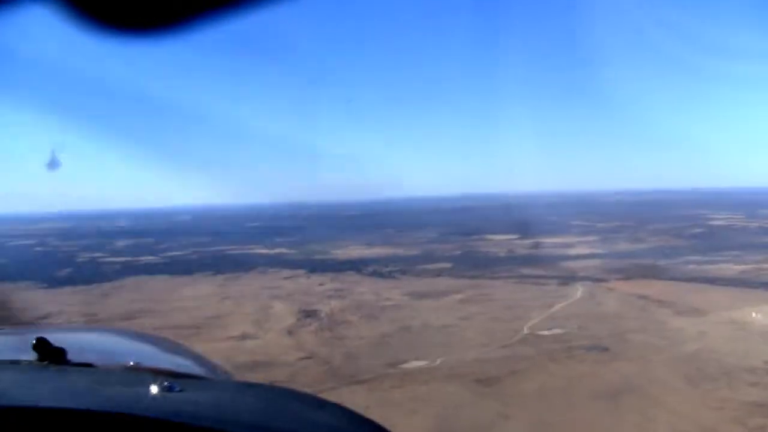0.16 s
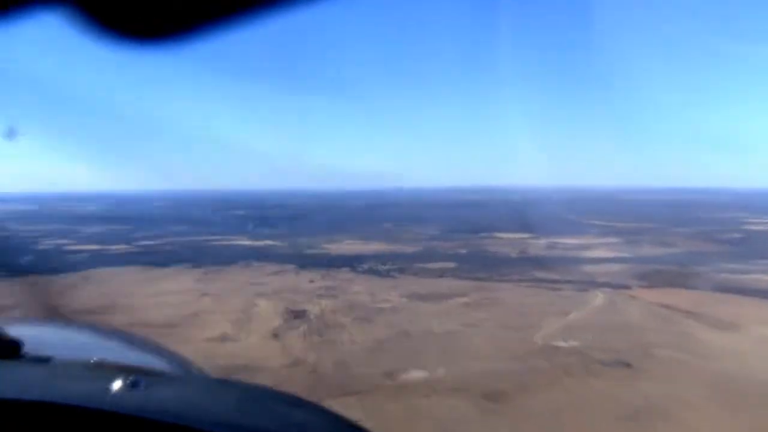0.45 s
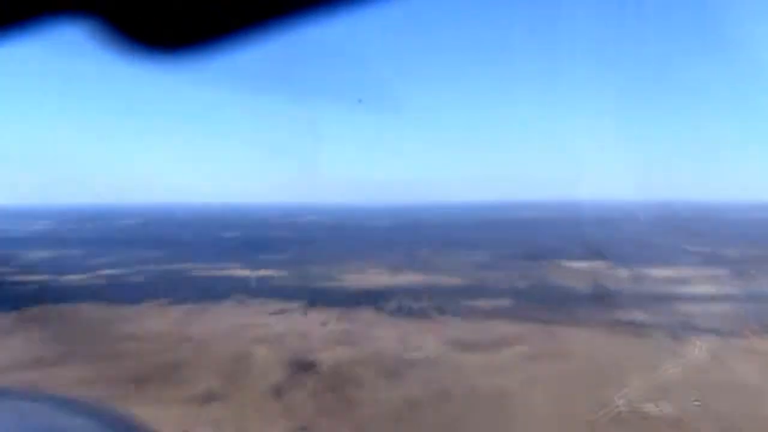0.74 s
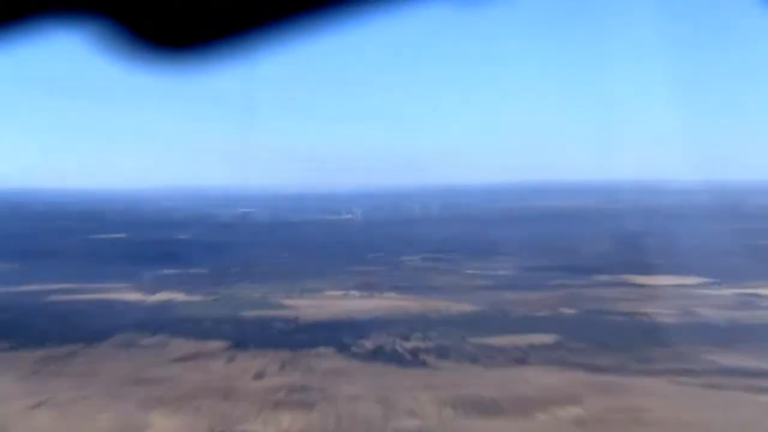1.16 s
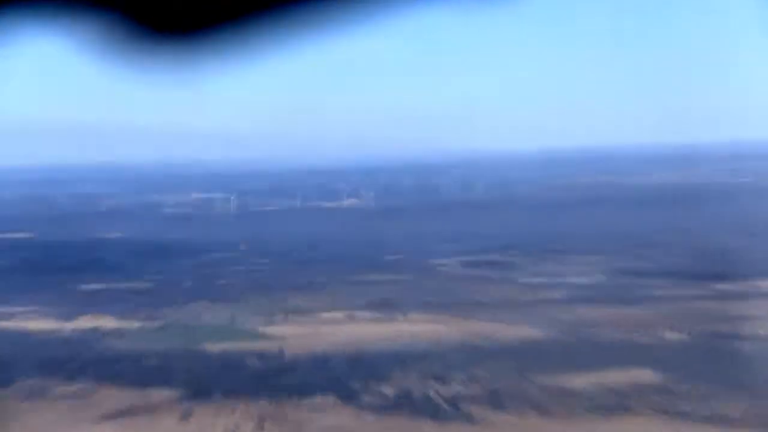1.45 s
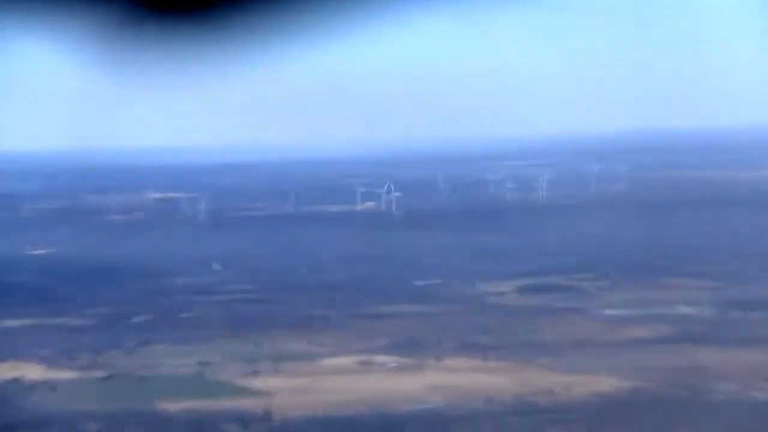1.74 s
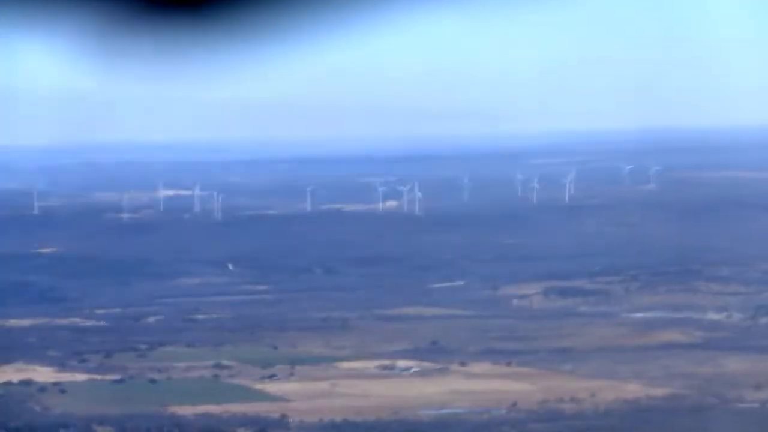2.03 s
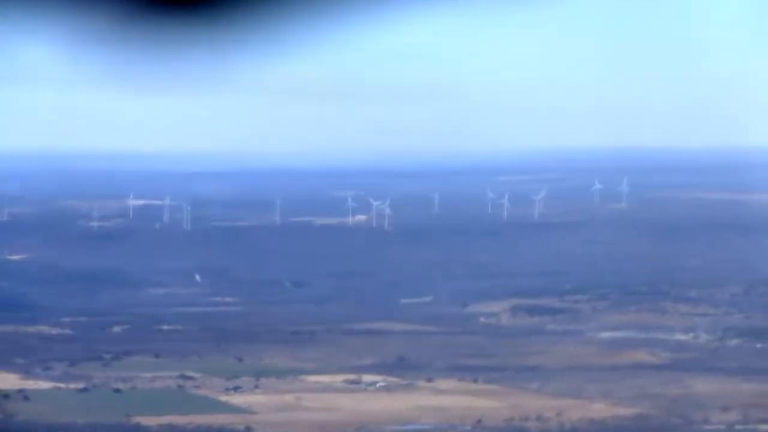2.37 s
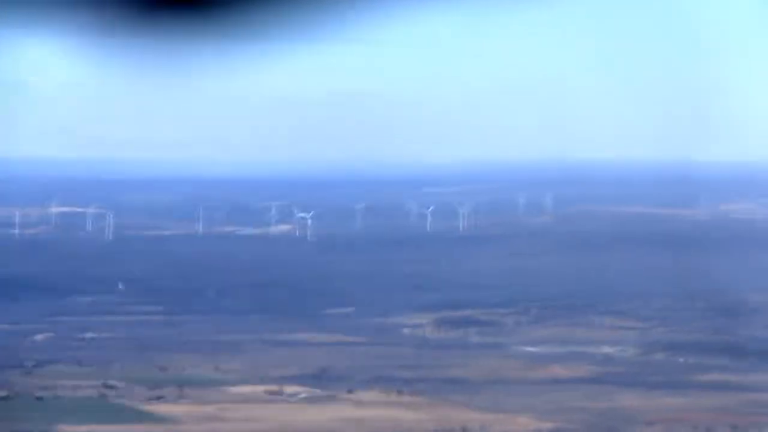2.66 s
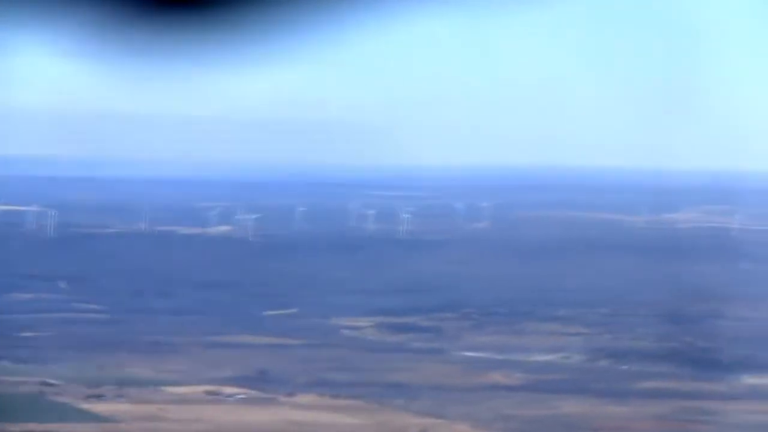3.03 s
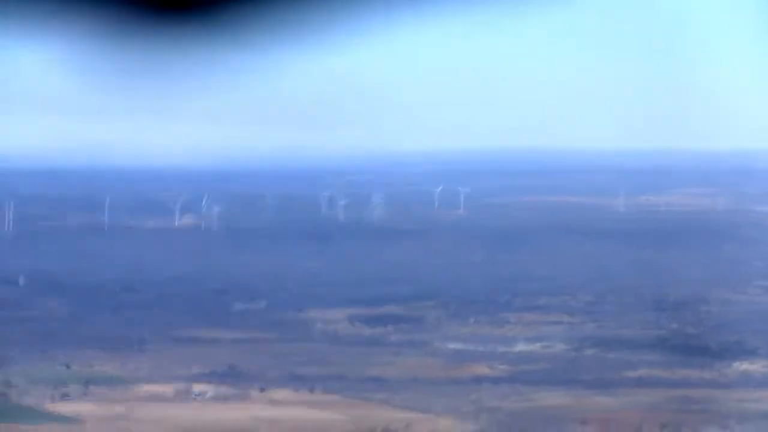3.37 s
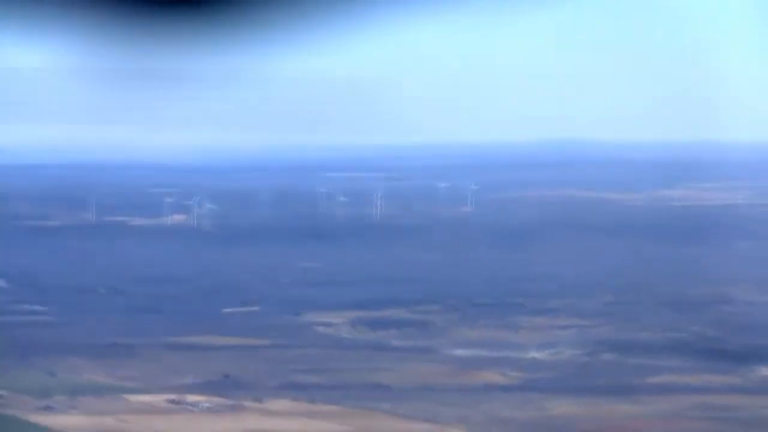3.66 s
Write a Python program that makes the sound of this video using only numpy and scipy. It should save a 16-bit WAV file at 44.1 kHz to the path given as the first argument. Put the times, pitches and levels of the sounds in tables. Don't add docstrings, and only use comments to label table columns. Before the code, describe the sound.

A small piston aircraft engine and propeller drone steadily in the cabin, louder on the right, over low wind buffeting. Thin hiss, a faint high whine and a few sharp electrical ticks sit on top.

```python
import sys
import numpy as np
from scipy import signal
from scipy.fft import rfft, irfft, next_fast_len
from scipy.io import wavfile
from scipy.ndimage import uniform_filter1d

SR = 44100
rng = np.random.default_rng(int(sys.argv[2]) if len(sys.argv) > 2 else 0)


def waveform_to_disk(signal):
    frames = np.transpose(np.atleast_2d(signal))
    scaled = np.clip(frames, -1, 1) * 32767
    samples = np.round(scaled).astype(np.int16)
    wavfile.write(sys.argv[1], SR, samples)


def gain_from_db(level_db):
    decades = np.asarray(level_db, float) / 20
    return 10 ** decades


N = 167580

# time [s], whine frequency [Hz].
WHINE_PITCH = [(0, 5048.5), (.8, 5048), (1.2, 5041), (1.8, 5033), (1.9, 5027.5), (2.15, 5028.5),
               (2.3, 5021.5), (2.7, 5021.5), (3.1, 5035), (3.4, 5047), (3.65, 5048), (3.8, 5044)]


def walk(rate_hz):
    hold = int(SR / rate_hz)
    held = np.repeat(rng.standard_normal(N // hold + 1), hold)
    return 1.39 * uniform_filter1d(uniform_filter1d(held, hold), hold)[:N]


def curve(table, axis):
    rows = np.array(table)
    return np.interp(np.arange(N) / SR, rows[:, 0], rows[:, axis])


def noise(shape, level_db, flicker_db, rate_hz, count):
    rows = np.array(shape)
    size = next_fast_len(N)
    log_hz = np.log(np.maximum(np.arange(size // 2 + 1) * SR / size, 1))
    shape_db = np.interp(log_hz, np.log(rows[:, 0]), rows[:, 1], -99, -99)
    spectrum = rfft(rng.standard_normal(size)) * gain_from_db(shape_db)
    centres = np.linspace(np.log(rows[0, 0]), np.log(rows[-1, 0]), count)
    out = 0
    for pick in np.eye(count):
        band = irfft(spectrum * np.interp(log_hz, centres, pick), size)[:N]
        out = out + band * gain_from_db(flicker_db * walk(rate_hz))
    return out * gain_from_db(level_db) / np.std(out)


def engine():
    # multiple of the cycle rate, level re the firing tone [dB].
    cycle_orders = [(2, -25), (3, -25), (4, 0), (5, -23), (6, -26), (8, -17), (9, -20.5), (10, -34),
                    (12, -25.5), (14, -33), (16, -35), (17, -41), (18, -37), (20, -31.5), (24, -44),
                    (26, -47), (27, -47), (28, -41), (31, -51), (33, -48), (35, -51), (36, -51), (39, -50),
                    (40, -47), (41, -49), (44, -49), (51, -58), (55, -58)]
    level_db, firing_sway_db, partial_sway_db = -18.5, .6, 2.2
    whine_per_firing, speed_jitter, wander_rad = 65.12, .0004, .35
    firing_hz = curve(WHINE_PITCH, axis=1) / whine_per_firing
    cycle_hz = firing_hz / 4 * (1 + speed_jitter * walk(6))
    cycle_rad = 2 * np.pi * np.cumsum(cycle_hz) / SR
    out = 0
    for order, db in cycle_orders:
        firing = order == 4
        start_rad = 2 * np.pi * rng.random()
        sway_db = (firing_sway_db if firing else partial_sway_db) * walk(4.476)
        start_rad = start_rad + wander_rad * walk(6.026)
        offset_rad = np.pi if firing else start_rad
        out = out + gain_from_db(db + sway_db) * np.sin(round(order) * cycle_rad + offset_rad)
    return out * np.sqrt(2) * gain_from_db(level_db)


def airflow():
    # frequency [Hz], density [dB per Hz].
    buffet_shape = [(3, -36), (20, -21), (38, 1.5), (70, -3.5), (105, -1.5), (135, -8.5), (200, -13.5),
                    (300, -25.5)]
    slipstream_shape = [(250, -4.5), (410, 0), (530, -5), (610, -8), (850, -12), (900, -12), (1050, -18),
                        (1900, -33)]
    gust_db = 1
    buffet = noise(buffet_shape, level_db=-26.5, flicker_db=1, rate_hz=6.58, count=7)
    buffet = buffet * gain_from_db(gust_db * walk(1.38))
    return buffet + noise(slipstream_shape, level_db=-45, flicker_db=-0.97, rate_hz=8.6, count=5)


def whine():
    # time [s], level [dB].
    whine_level = [(0, -58), (.5, -57), (1.2, -57.5), (1.72, -60), (1.78, -52.5), (1.84, -57), (2.8, -58.5),
                   (3.1, -57), (3.8, -57)]
    # multiple of comb_hz, level [dB].
    comb_teeth = [(1, -78), (2, -78), (3, -77), (4, -80), (7, -81), (8, -83)]
    flutter_hz, flutter_rad, octave_db = 32, .68, -11.5
    comb_hz, lone_hz, lone_db = 1185.5, 1472, -73
    t_s = np.arange(N) / SR
    phase_rad = 2 * np.pi * np.cumsum(curve(WHINE_PITCH, axis=1)) / SR
    phase_rad = phase_rad + flutter_rad * np.sin(2 * np.pi * flutter_hz * t_s)
    tone = np.sin(phase_rad) + gain_from_db(octave_db) * np.sin(2 * phase_rad)
    tone = tone * gain_from_db(curve(whine_level, axis=1) + 0.9 * walk(12))
    comb = sum(gain_from_db(db) * np.sin(2 * np.pi * round(k) * comb_hz * t_s) for k, db in comb_teeth)
    lone = gain_from_db(lone_db) * np.sin(2 * np.pi * lone_hz * t_s)
    return np.sqrt(2) * (tone + comb + lone)


def ticks():
    # time [s], height [dB], flat top [ms], undershoot [0-1].
    tick_events = [
        (.021949, -18.3, 0, .02),
        (.042021, -18.8, 0, .13),
        (.043135, -18, .075, .2),
        (1.005895, -19.2, 0, .05),
        (1.829409, -18.8, 0, .02),
        (2.181824, -18.8, 0, 0),
        (3.011781, -17.5, 0, .03),
    ]
    edge_ms, recover_ms = .023, .3
    out = np.zeros(N)
    for start_s, db, top_ms, undershoot in tick_events:
        i = int(start_s * SR) + np.arange(-20, 200)
        ms = (i / SR - start_s) * 1000
        outside_ms = np.maximum(abs(ms) - top_ms / 2, 0)
        spike = np.exp(-.5 * (outside_ms / edge_ms) ** 2)
        late_ms = np.maximum(ms - top_ms / 2 - edge_ms, 0)
        dip = undershoot * np.exp(-late_ms / recover_ms) * (1 - np.exp(-late_ms / edge_ms))
        out[i] += gain_from_db(db) * (spike - dip)
    return out


def scene():
    # frequency [Hz], density [dB per Hz].
    hiss_shape = [(400, -10.5), (1500, 0), (2200, -1), (4000, -3), (7000, -4), (11000, -6.5), (14000, -9),
                  (16000, -11.5)]
    hiss_db, own_hiss_db = -53, -11
    cabin_left_db, wiring_right_db = -8, -2.0
    cabin = engine() + airflow()
    wiring = whine() + ticks() + noise(hiss_shape, hiss_db, flicker_db=.5, rate_hz=10, count=6)
    own = [noise(hiss_shape, hiss_db + own_hiss_db, flicker_db=0, rate_hz=12, count=2) for _ in range(2)]
    left = cabin * gain_from_db(cabin_left_db) + wiring + own[0]
    right = cabin + wiring * gain_from_db(wiring_right_db) + own[1]
    return np.array([left, right])


def roll_off(x):
    return signal.sosfilt(signal.butter(12, 16180, fs=SR, output="sos"), x)


def record(dry):
    fade_s, top_hz = .004, 15800
    t_s = np.arange(N) / SR
    soft = dry * np.clip(np.minimum(t_s, t_s[-1] - t_s) / fade_s, 0, 1)
    low_pass = signal.ellip(10, .1, 60, top_hz, fs=SR, output="sos")
    return roll_off(signal.sosfiltfilt(low_pass, soft))


dry = scene()
out = record(dry)
waveform_to_disk(out)
```